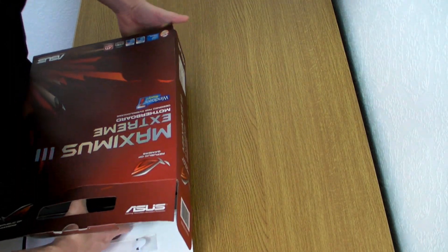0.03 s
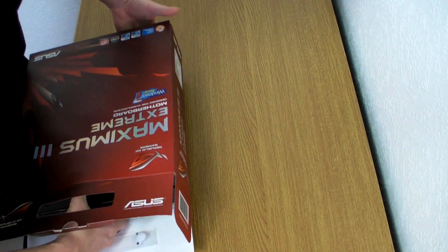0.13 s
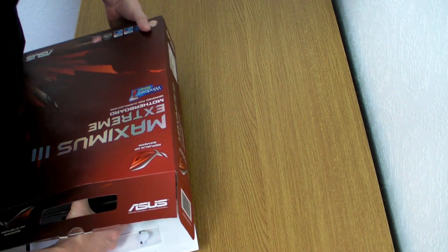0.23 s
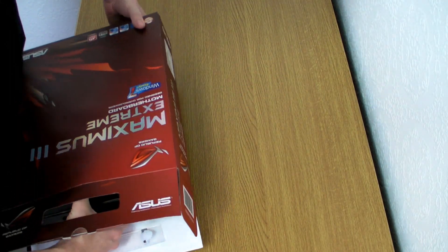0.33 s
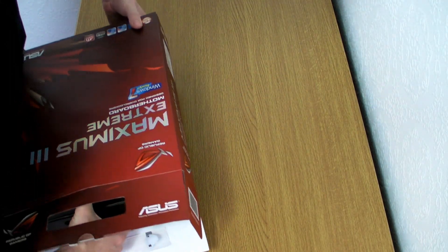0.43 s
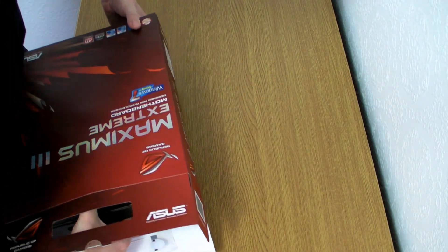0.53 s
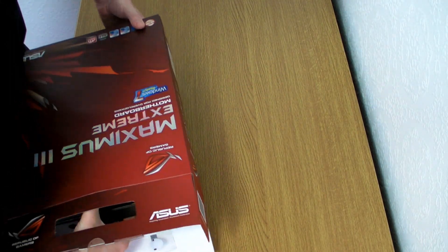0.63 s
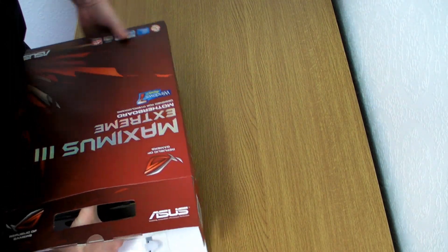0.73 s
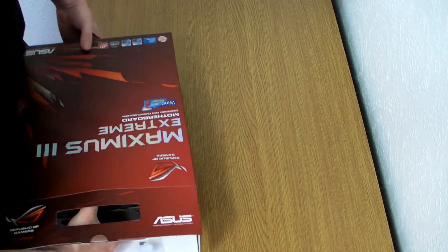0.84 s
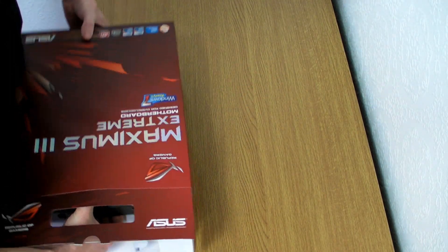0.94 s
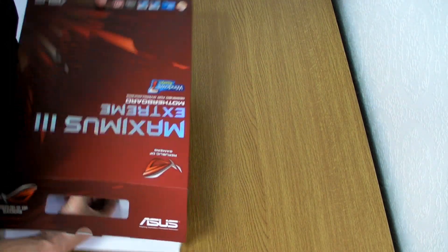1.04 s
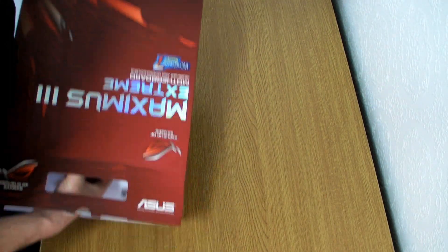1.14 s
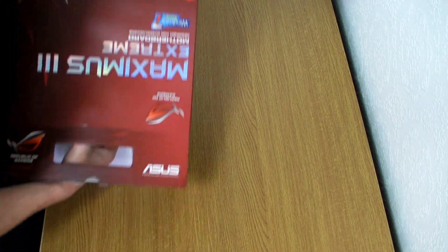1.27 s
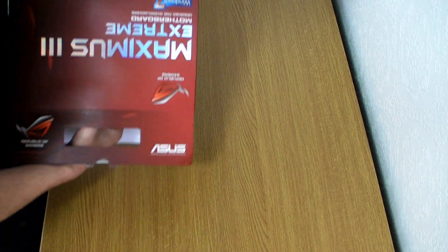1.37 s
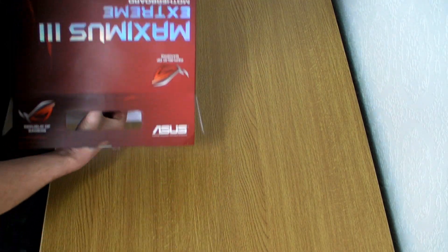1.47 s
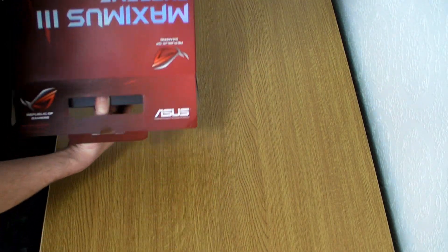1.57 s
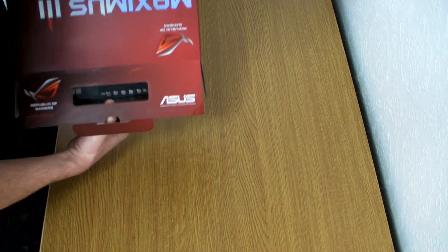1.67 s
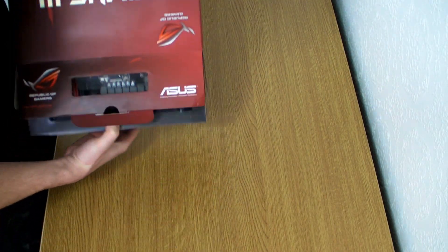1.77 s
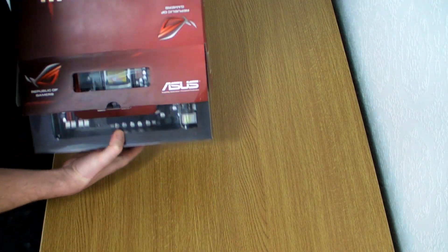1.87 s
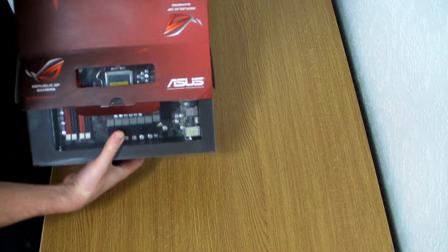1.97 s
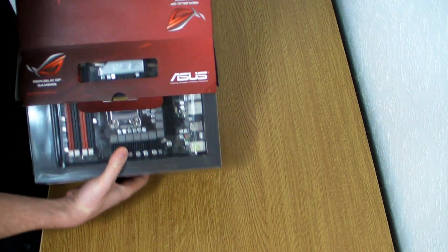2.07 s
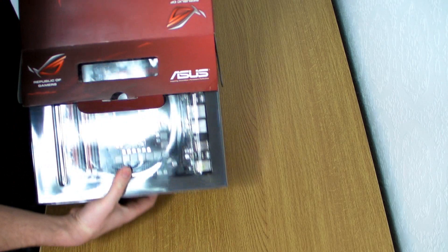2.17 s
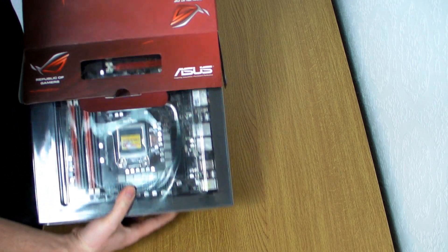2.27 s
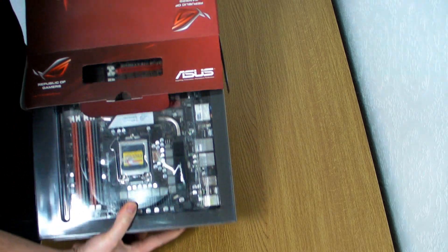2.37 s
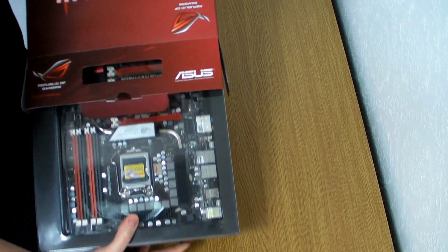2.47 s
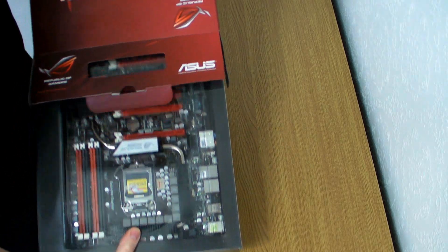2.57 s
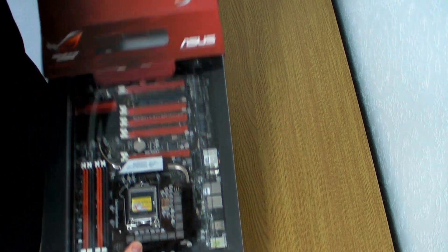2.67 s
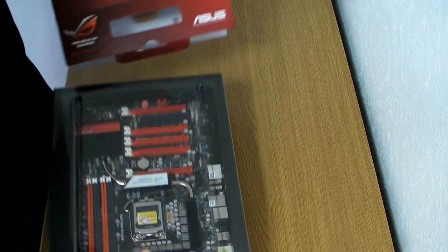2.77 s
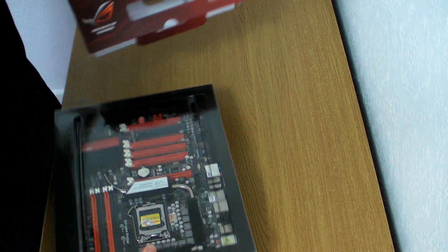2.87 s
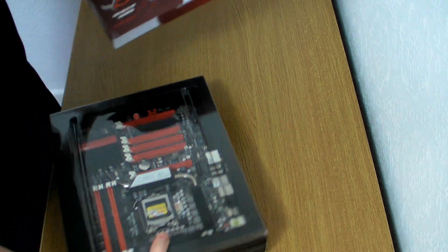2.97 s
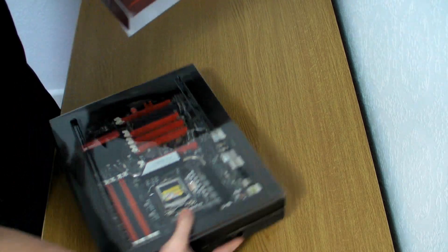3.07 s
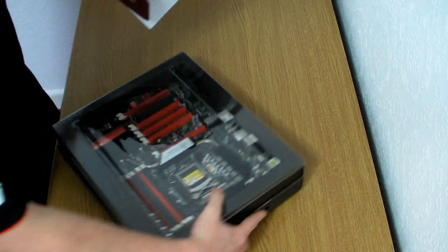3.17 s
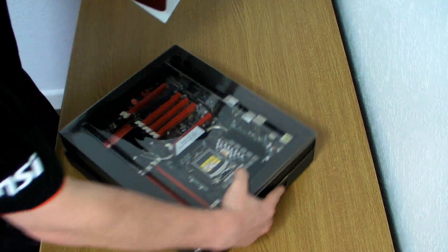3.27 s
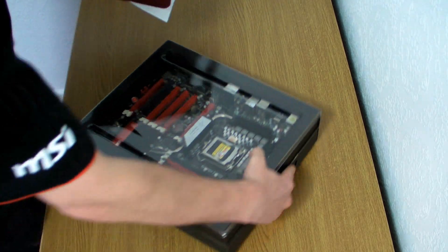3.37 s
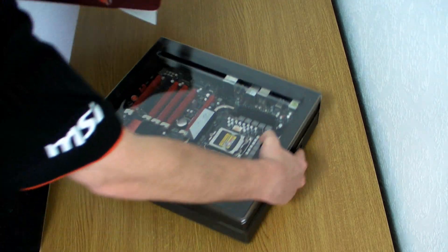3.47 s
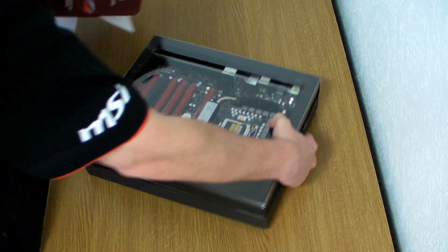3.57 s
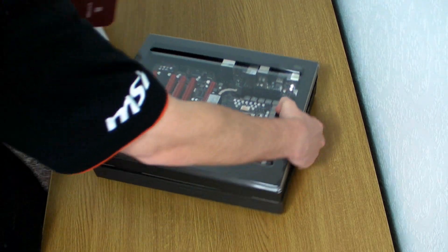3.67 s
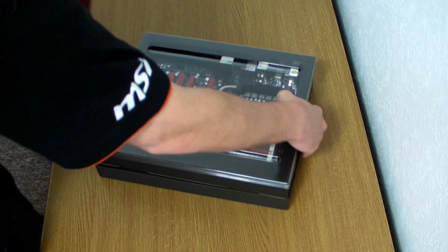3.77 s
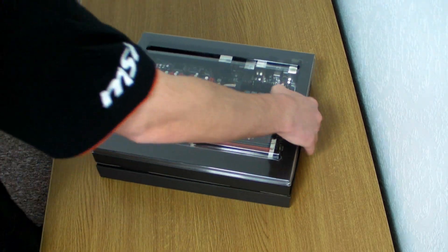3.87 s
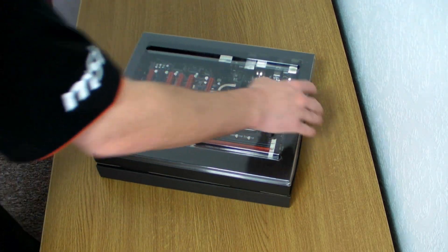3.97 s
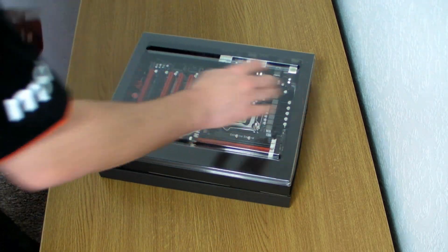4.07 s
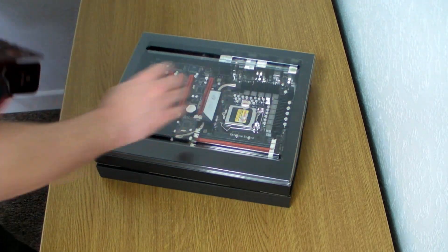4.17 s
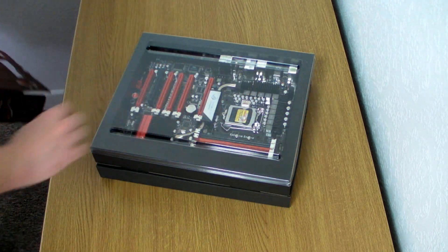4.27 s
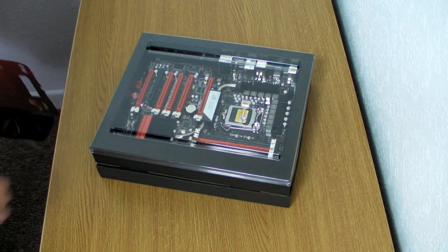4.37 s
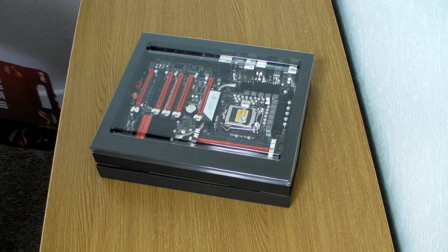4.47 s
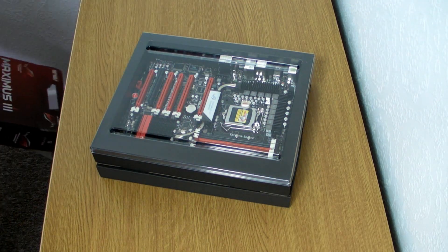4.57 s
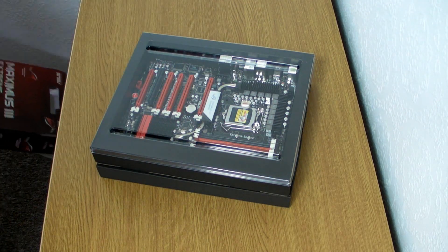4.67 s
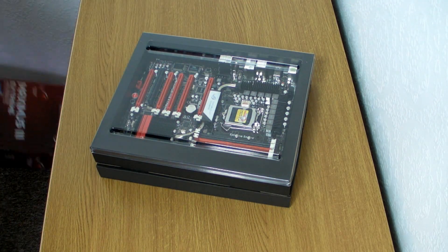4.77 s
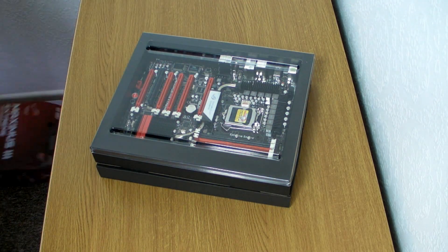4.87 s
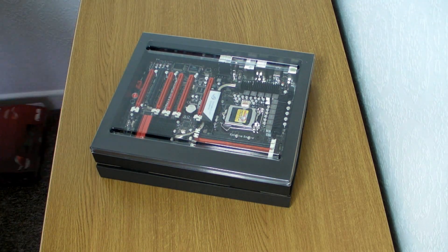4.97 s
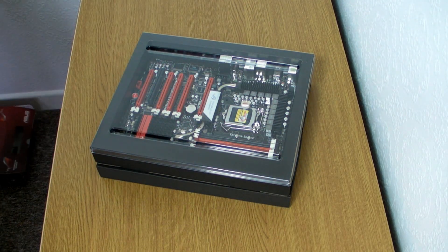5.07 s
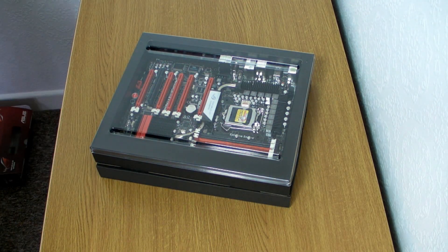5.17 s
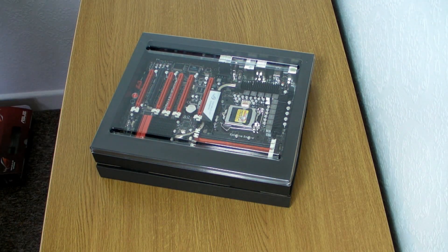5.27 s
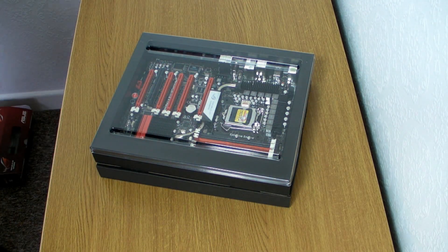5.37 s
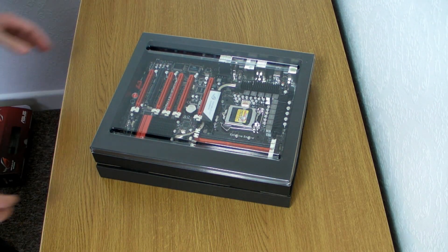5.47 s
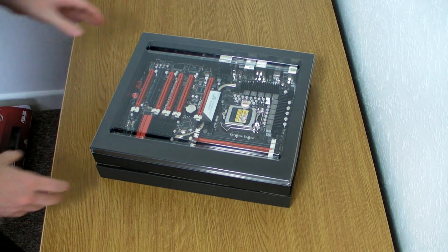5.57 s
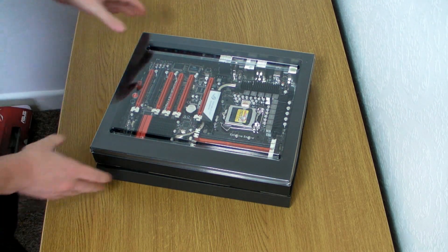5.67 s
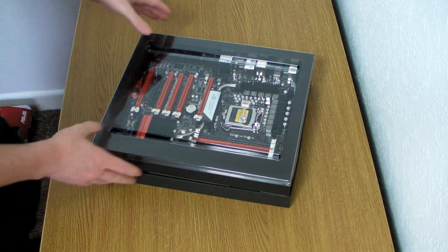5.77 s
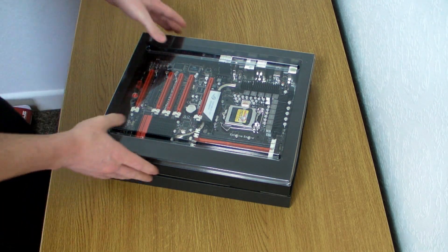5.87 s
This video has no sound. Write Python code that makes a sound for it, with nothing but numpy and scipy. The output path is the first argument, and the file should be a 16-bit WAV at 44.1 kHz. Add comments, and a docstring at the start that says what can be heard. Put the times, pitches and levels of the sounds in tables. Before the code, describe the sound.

A cardboard sleeve scrapes and squeaks off a box, which knocks on a wooden desk before the empty sleeve tumbles with hollow thumps.

```python
"""A small room with a wooden desk, where a cardboard sleeve is slid off an inner box.
The card hisses and squeaks as it catches and slips, and snaps as it buckles. The heavy box knocks
down on the desk and is turned; the empty sleeve drops and tumbles, its flexing panels thumping.
A small stereo camera microphone picks it all up, with a steady hiss and faint room noise."""
import sys
import numpy as np
from scipy import signal
from scipy.fft import rfft, irfft, next_fast_len
from scipy.io import wavfile
from scipy.ndimage import uniform_filter1d, map_coordinates

SR = 44100
rng = np.random.default_rng(int(sys.argv[2]) if len(sys.argv) > 2 else 0)


def generate_wav(signal):
    """Clip the signal to [-1, 1] and save it as 16-bit WAV at the path in sys.argv[1]."""
    frames = np.transpose(np.atleast_2d(signal))
    scaled = np.clip(frames, -1, 1) * 32767
    pcm = np.round(scaled).astype(np.int16)
    wavfile.write(sys.argv[1], SR, pcm)


N = 260631

# Levels and gains in the tables are relative; the functions add their own offsets.
# Thin card catches as the sleeve is gripped, its flap is freed and the box slides out;
# at the end, fingers meet the box again: start_s, crush_ms, level_db, thud_db, hardness_db
CARD_CATCHES = [(.001, 2.4, -45.5, -21, 8.5), (.013, 6.2, -56.5, -30, 16), (.151, 4.7, -35.5, -17.5, -10.5),
                (.224, 5.2, -45.5, 0, -1.5), (.45, 11.6, -48.5, -13, 3.5), (.79, 20, -56, -16, 7),
                (.922, 4.1, -37.5, -10, 6.5), (.93, 11.8, -38, -13, 6), (.948, 18.4, -34.5, -26, 2),
                (1.106, 5, -60, 2, -11), (1.197, 10.7, -42.5, -30, -6.5), (1.578, 4.6, -40.5, -23, -3),
                (1.608, 15, -44, -28, -10), (1.93, 3.1, -36, -18, 3.5), (1.943, 6.5, -40, -14, -7),
                (1.976, 7, -43, -6, -0.5), (2.513, 14, -46, -28, -1), (2.682, 18, -30, -14, -13),
                (2.722, 11, -34.5, -30, -3), (2.749, 4.6, -32, -25, -7.5), (2.781, 5.5, -33, -29, -3),
                (2.801, 3.4, -37, -25, -2.5), (5.874, 2.4, -55, -6, 0)]
# The box lands on an edge, rocks and is turned: start_s, crush_ms, level_db, thud_db, hardness_db
BOX_LANDINGS = [(2.955, 2.1, -27, -34, -12), (2.999, 3, -29.5, -14.5, -2.5), (3.006, 4, -25.5, -24, -3.5),
                (3.134, 6.9, -29.5, -18.5, -5), (3.387, 2.6, -48.5, -25, -9), (3.552, 6.4, -49, -5, -10),
                (3.859, 6.7, -37.5, -9, -5), (3.875, 3.5, -32.5, -8, -4), (3.886, 5.6, -32, -21, -6),
                (3.935, 4.2, -43.5, -3.5, -1.5), (4.075, 6.6, -53, -21, -23)]
# The sleeve hits a corner, tumbles and lands flat: start_s, crush_ms, level_db, thud_db, hardness_db
SLEEVE_TUMBLE = [(4.914, 5.7, -34.5, -14, -4.5), (4.924, 5.8, -25, -10, -8.5),
                 (4.936, 15.5, -24, -12, -7.5), (4.961, 5.6, -23.5, -15, -6),
                 (4.971, 4.4, -29.5, -22, -1.5), (4.983, 8.5, -28, -12, -2), (5.008, 6.9, -25, -1.5, -5),
                 (5.021, 11.7, -29, -3, -8.5), (5.036, 7.4, -33.5, -4, -2), (5.073, 2.5, -31.5, -19, -8),
                 (5.125, 7.7, -48.5, -5, 0)]
# The tone of struck cardboard: frequency_hz, gain_db
KNOCK_TONE = [(40, -31), (70, -24.5), (140, -17), (210, -9), (310, -8), (470, -7.5), (620, -11),
              (1000, -13), (1500, -15), (2500, -20.5), (3500, -21.5), (7400, -22), (9000, -26),
              (15000, -29.5)]
# The four parts of a knock (body, thud, rap, crack): low_hz, high_hz
KNOCK_BANDS = [(160, 700), (45, 160), (700, 2500), (2500, 15500)]
# Pitches at which knocks and rubbed panels ring on: pitch_hz, width_hz, strength_db
RESONANCES = [(434, 28, -16.5), (1290, 30, -32), (1630, 250, -18), (1800, 47, -23)]
# Whole panels flex, deepest when the sleeve falls flat: start_s, pitch_hz, fade_60db_s, level_db
PANEL_BOOMS = [(0.157, 205, 0.089, -20), (4.442, 136, 0.032, -33), (4.926, 166, .2, -20.5),
               (5.005, 77, 0.12, -17.5), (5.018, 145, 0.3, -24.5), (5.021, 233.3, 0.41, -29)]
# The long pull of the box out of its sleeve: time_s, level_db
LONG_PULL = [(1.44, -86), (1.46, -63), (1.6, -41), (1.69, -43), (1.938, -43), (2.04, -47), (2.358, -45.5),
             (2.498, -53.5), (2.594, -47), (2.684, -43.5), (2.808, -54), (2.902, -80), (2.92, -73)]
# Short rubs of card on card, hand and wood: peak_s, hold_s, hiss_db, panel_db
SHORT_RUBS = [(0, .025, -43, -42), (0.117, 0.0081, -43, -45.5), (0.286, 0.076, -50.5, -52.5),
              (0.454, 0.022, -44.5, -57), (0.502, 0.16, -50.5, -55.5), (0.795, 0.15, -52.5, -50.5),
              (0.948, 0.027, -47, -52), (1.028, 0.33, -53, -50), (2.756, 0.023, -60, -32.5),
              (3.07, 0.065, -55, -42), (3.199, 0.12, -50.5, -45.5), (3.393, 0.066, -56, -54.5),
              (3.627, 0.057, -48, -49), (3.752, .2, -52.5, -48.5), (4.243, 0.03, -58.5, -60.5),
              (4.535, .03, -62, -62.5), (4.731, 0.044, -55.5, -57), (4.886, 0.064, -53.5, -60),
              (5.352, 0.095, -57, -60.5), (5.759, .025, -55.5, -59)]
# The tone of the rubbing hiss as picked up, with a dip near 12 kHz: frequency_hz, gain_db
RUB_HISS_TONE = [(700, -24), (1300, -7.5), (2200, -6.5), (4000, -8.5), (7400, -9), (9000, -12),
                 (12000, -16), (13500, -12), (15500, -18)]
# The tone of rubbed panels: frequency_hz, gain_db
PANEL_TONE = [(40, -43), (100, -9.5), (170, -7.5), (280, -8.5), (430, 0.5), (600, -3), (900, -2.5),
              (1400, -8.5), (2200, -20), (5000, -35)]
# Glossy card sticks and slips: start_s, length_s, pitch_hz, level_db, roughness_share
CARD_SQUEAKS = [(.111, 0.0089, 3594, -41, 0.15), (0.119, 0.03, 4130, -49, .13),
                (1.595, 0.035, 4500, -49.5, .04), (1.655, 0.01, 2270, -35.5, 0.097),
                (1.74, 0.037, 3370, -50, 0.038), (1.764, 0.034, 1301, -40.5, 0.054),
                (1.773, 0.011, 3900, -45, 0.035), (1.894, 0.016, 4480, -46, 0.046),
                (2.33, 0.037, 3660, -50, 0.057), (5.756, 0.018, 1786, -61.5, 0.083)]
# How long the room echoes: frequency_hz, fade_60db_s
ROOM_FADE = [(60, 0.84), (150, 0.27), (450, 0.57), (1500, 0.65), (5000, 0.58), (14000, 0.62)]
# How wide scattered sound is in stereo: frequency_hz, side_minus_mid_db
STEREO_WIDTH = [(60, -20), (250, -23), (500, -22), (1000, -17.5), (2000, -8.5), (4000, -3.8), (8000, -.3),
                (14000, -.7)]
# The microphone's own hiss: frequency_hz, gain_db
MIC_HISS_TONE = [(25, -17), (80, -2), (160, -3), (270, -5.5), (410, 0.5), (650, -1.5), (1400, -8),
                 (3000, -13), (7000, -19), (9500, -18.5), (15500, -31)]
# Faint room noise, a soft midrange rush over a low hum: frequency_hz, gain_db
ROOM_NOISE_TONE = [(25, -27), (50, -25), (75, -7), (130, -7), (250, -25), (1000, -5), (4000, -25)]


def contacts():
    """Thin card snaps, the heavy box knocks dully on wood, and the empty sleeve sounds hollow."""
    card = knocks(CARD_CATCHES, rise_share=.23, crack_db=-7.5, ring_hz=484, ring_db=-3.5,
                  octaves_per_db=.04)
    box = knocks(BOX_LANDINGS, rise_share=.33, crack_db=-11.5, ring_hz=1820, ring_db=-7,
                 octaves_per_db=1)
    sleeve = knocks(SLEEVE_TUMBLE, rise_share=.42, crack_db=-4, ring_hz=526, ring_db=-14,
                    octaves_per_db=.7)
    return card + box + sleeve


def knocks(rows, rise_share, crack_db, ring_hz, ring_db, octaves_per_db):
    """Each knock briefly crushes the card: a flat hit thuds, a hard one raps and cracks."""
    out = np.zeros((2, N))
    ms = np.arange(SR // 10) / SR * 1000
    box_ring = cardboard(signal.unit_impulse(SR // 8), KNOCK_TONE)
    bandpasses = [signal.butter(3, band, "bandpass", fs=SR, output="sos") for band in KNOCK_BANDS]
    for start_s, crush_ms, level_db, thud_db, hardness_db in rows:
        rise = (1 - np.exp(-ms / (rise_share * crush_ms))) ** 2
        crush = grains(len(ms), spread_db=4) * rise * np.exp(-ms / crush_ms)
        knock = signal.fftconvolve(crush, box_ring)
        patch_hz = ring_hz * 2 ** (octaves_per_db * hardness_db)  # harder: a smaller, higher patch rings
        knock += amp(ring_db) * signal.lfilter(*signal.iirpeak(patch_hz, Q=3, fs=SR), knock)
        treble_db = crack_db + hardness_db
        cutoff_hz = min(12000 * amp(.95 * treble_db), SR / 3)  # a soft hit loses its highs first
        knock = signal.lfilter(*signal.butter(1, cutoff_hz, fs=SR), knock)
        heard = room(knock, early_db=7, early_fade_s=.14)[:, :SR // 2]
        for bandpass, share_db in zip(bandpasses, (-3, thud_db - 4, hardness_db, treble_db)):
            band = signal.sosfilt(bandpass, heard)
            strength = np.sqrt(np.sum(band ** 2) / (.075 * SR))  # as if packed into 75 ms
            add(out, start_s, amp(level_db + share_db) * band / strength)
    return out


def booms(rise_s=.015):
    """A bent panel pushes the air as it swings at its lowest pitch."""
    out = np.zeros((2, N))
    t = np.arange(SR // 2) / SR
    for start_s, pitch_hz, fade_s, level_db in PANEL_BOOMS:
        swing = np.sin(2 * np.pi * pitch_hz * t) * (1 - np.exp(-t / rise_s))
        add(out, start_s, (amp(level_db - 60 * t / fade_s) * swing)[None])
    return out


def sliding():
    """Fibres catch and slip with a grainy hiss, while uneven drag shakes the hollow panels."""
    hiss_gain, panel_gain = rub_strength()
    judder_db = 1.2 * wobble(rate_hz=45)
    slips = patchy(grains((2, N), spread_db=4), depth_db=1.8)
    hiss = shaped(stereo_spread(slips), RUB_HISS_TONE)
    drag = stereo_spread(patchy(grains((2, N), spread_db=2.5), depth_db=1.5))
    drag *= amp(judder_db + .36 * wobble(rate_hz=120))
    panels = cardboard(drag, PANEL_TONE)
    return hiss_gain * amp(judder_db / 2) * unit(hiss) + panel_gain * amp(-4) * unit(panels)


def rub_strength(swell_db=6.5, longest_swell_s=.08, fade_db_per_s=103, stop_db=4, stop_s=.022):
    """How strong the hiss and panel drag are: one long pull, plus rubs that swell, hold and fade."""
    t = np.arange(N) / SR
    times, levels = np.transpose(LONG_PULL)
    outside_s = np.abs(t - np.clip(t, times[0], times[-1]))
    pull_db = np.interp(t, times, levels) - fade_db_per_s * outside_s
    power = (amp([[4], [2.5]]) * amp(pull_db)) ** 2  # two rows: hiss, panels
    power += amp([[-64.5], [-87]]) ** 2  # clothes rustle faintly between rubs
    for peak_s, hold_s, hiss_db, panel_db in SHORT_RUBS:
        before_s = np.maximum(peak_s - t, 0)
        after_s = np.maximum(t - peak_s - hold_s, 0)
        swell = -swell_db * before_s / min(hold_s, longest_swell_s)
        # The direct sound stops quickly, then the room's echo dies away.
        release = -stop_db * np.minimum(after_s / stop_s, 1) - fade_db_per_s * after_s
        power += (amp([[hiss_db], [panel_db]]) * amp(swell + release)) ** 2
    return np.sqrt(power)


def squeaks(glide_share=.036):
    """Glossy card slips at an almost regular rate, making a short, rough, slightly rising note."""
    out = np.zeros((2, N))
    for start_s, length_s, pitch_hz, level_db, roughness in CARD_SQUEAKS:
        n = int(length_s * SR)
        progress = np.linspace(0, 1, n)
        waver = unit(uniform_filter1d(rng.standard_normal(SR // 10), size=30))[:n]
        slip_hz = pitch_hz * (1 + glide_share * (progress - .5) + roughness * waver)
        tone = np.sin(2 * np.pi * np.cumsum(slip_hz) / SR) * np.sin(np.pi * progress)
        heard = room(tone, early_db=3, early_fade_s=.09)
        add(out, start_s, amp(level_db) * heard / np.std(heard[:, :n]))
    return out


def cardboard(x, tone):
    """The hollow box and the desk colour a sound and ring on after it."""
    def gain(hz):
        peaks = sum(amp(db) * bump(hz, pitch_hz, width_hz) for pitch_hz, width_hz, db in RESONANCES)
        return amp(along(tone, hz)) * (1 + peaks)
    return filtered(x, lambda hz: ringing(gain(hz)))


def room(sound, early_db, early_fade_s):
    """A sound arrives directly, then bounces off desk and wall, then lingers as an echo."""
    hz, t, spectrum = signal.stft(rng.standard_normal((2, SR // 2)), SR, nperseg=256)
    late = amp(-60 * t / along(ROOM_FADE, hz)[:, None])
    early = amp(early_db - 60 * t / early_fade_s)
    echo = stereo_spread(signal.istft(spectrum * (late + early), SR, nperseg=256)[1])
    echo /= np.linalg.norm(echo[0])
    echo[:, 0] += .5  # the direct sound
    return signal.fftconvolve(sound[None], echo, axes=1)


def background(hiss_db=-63, room_noise_db=-70):
    """Each side of the microphone hisses on its own; faint room noise reaches both alike."""
    hiss = shaped(rng.standard_normal((2, N)), MIC_HISS_TONE)
    room_noise = shaped(rng.standard_normal(N), ROOM_NOISE_TONE)
    return amp(hiss_db) * unit(hiss) + amp(room_noise_db) * unit(room_noise)


def grains(shape, spread_db):
    """Tiny random slips of very unequal size."""
    return unit(rng.standard_normal(shape) * amp(spread_db * rng.standard_normal(shape)))


def patchy(x, depth_db):
    """As the touching spots shift, different pitches stand out."""
    spectrum = signal.stft(x, nperseg=512)[2]
    patches = uniform_filter1d(rng.standard_normal(spectrum.shape[1:]), size=4, axis=0)
    patches = uniform_filter1d(patches, size=8, axis=1)
    return signal.istft(spectrum * amp(depth_db * unit(patches)), nperseg=512)[1][:, :N]


def stereo_spread(pair):
    """Blend two unrelated noises into scattered sound, wider in the highs than in the lows."""
    def shares(hz):
        angle = np.arctan(amp(along(STEREO_WIDTH, hz)))
        return np.array([np.cos(angle), np.sin(angle)])
    mid, side = filtered(pair, shares)
    return np.array([mid + side, mid - side]) / np.sqrt(2)


def wobble(rate_hz):
    """A smooth curve through rate_hz random points a second."""
    points = rng.standard_normal(int(N * rate_hz / SR) + 4)
    return map_coordinates(points, [np.arange(N) * rate_hz / SR])


def shaped(x, tone):
    """Colour a sound with a tone table."""
    return filtered(x, lambda hz: amp(along(tone, hz)))


def filtered(x, response):
    """Scale each frequency in x by response(hz)."""
    n = x.shape[-1]
    padded = 2 * next_fast_len(n // 2 + 4096)
    hz = np.fft.rfftfreq(padded, 1 / SR)
    return irfft(rfft(x, padded) * response(hz), padded)[..., :n]


def ringing(gain):
    """Turn gains into a filter that rings only after it is struck (minimum phase)."""
    cepstrum = irfft(np.log(np.maximum(gain, 1e-6)))
    half = len(cepstrum) // 2
    cepstrum[1:half] *= 2
    cepstrum[half + 1:] = 0
    return np.exp(rfft(cepstrum))


def bump(hz, centre_hz, width_hz):
    """A rounded peak of height 1."""
    return 1 / (1 + (2 * (hz - centre_hz) / width_hz) ** 2)


def along(table, hz):
    """Read between a table's rows on a log frequency scale."""
    frequencies, values = np.transpose(table)
    return np.interp(np.log(hz + 1), np.log(frequencies + 1), values)


def add(out, start_s, sound):
    """Mix a sound in at start_s."""
    part = out[:, max(0, round(start_s * SR)):][:, :sound.shape[1]]
    part += sound[:, :part.shape[1]]


def amp(db):
    """Turn decibels into a gain."""
    return 10 ** (np.asarray(db) / 20)


def unit(x):
    """Scale to an average power of 1."""
    return x / np.sqrt(np.mean(x ** 2) + 1e-20)


def scene():
    """All the sounds together, a touch stronger on the right."""
    return (contacts() + booms() + sliding() + squeaks() + background()) * amp([[-.2], [.2]])


def record(dry, boxy_hz=432, notch_hz=7950, top_hz=15700):
    """The microphone adds a boxy low ring, has a narrow dip in the treble and cuts the very top."""
    def response(hz):
        boxy = ringing(1 + bump(hz, boxy_hz, width_hz=90))
        notch = 1 - bump(hz, notch_hz, width_hz=260)
        return boxy * notch * (hz < top_hz)
    return filtered(dry, response)


dry = scene()
out = record(dry)
generate_wav(out)
```